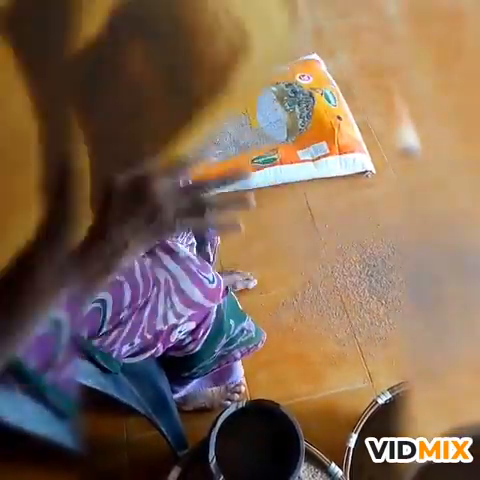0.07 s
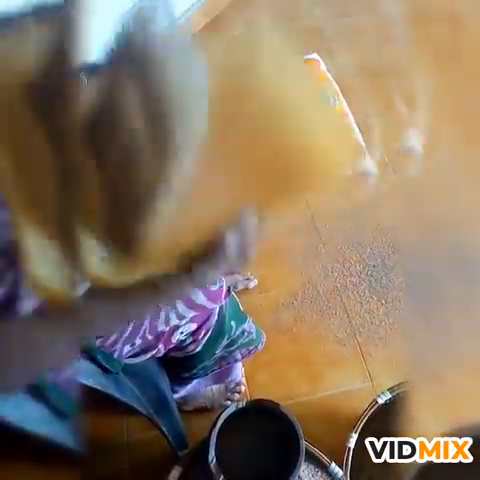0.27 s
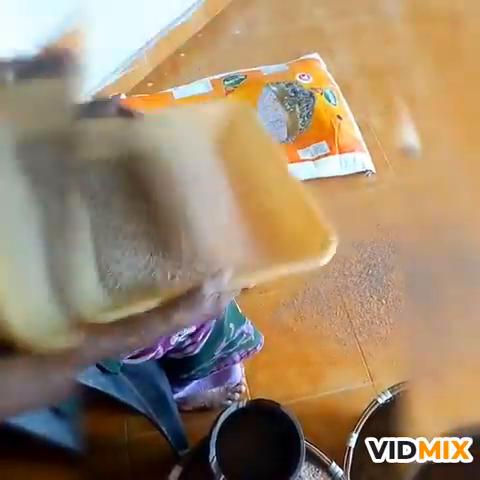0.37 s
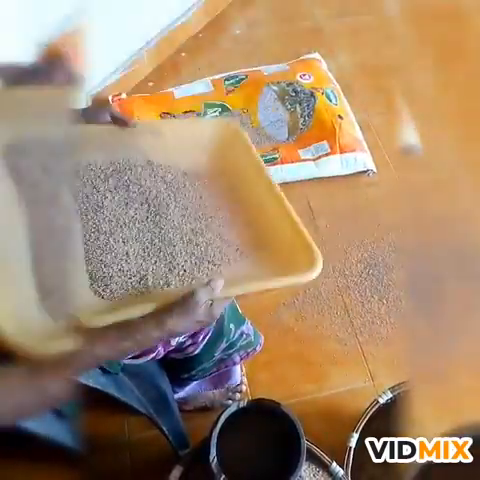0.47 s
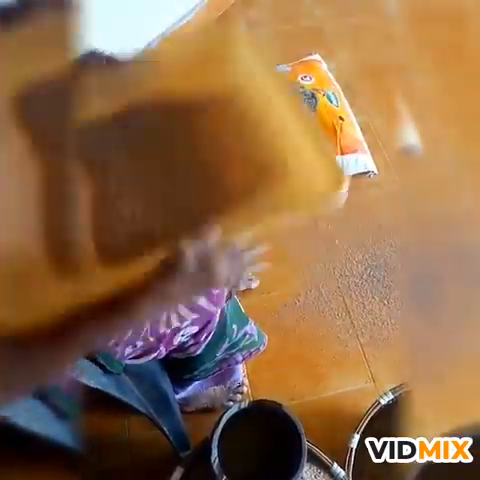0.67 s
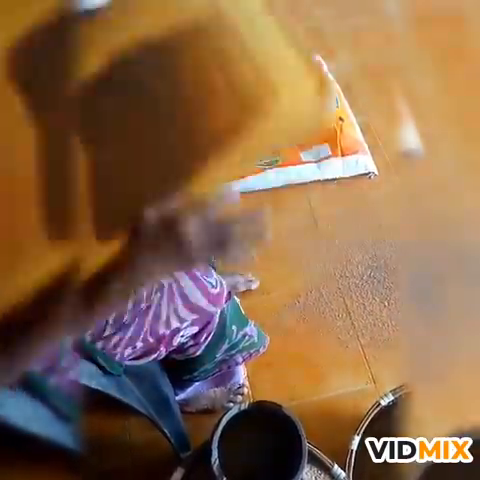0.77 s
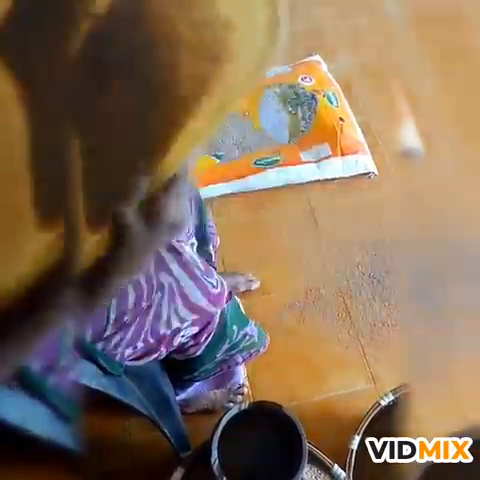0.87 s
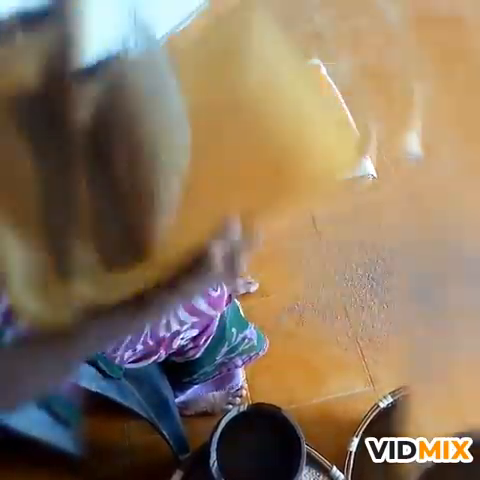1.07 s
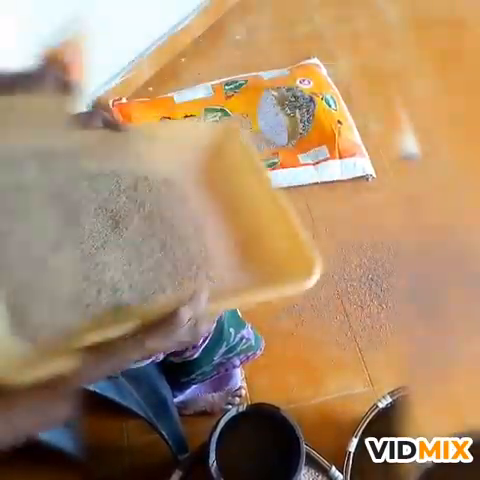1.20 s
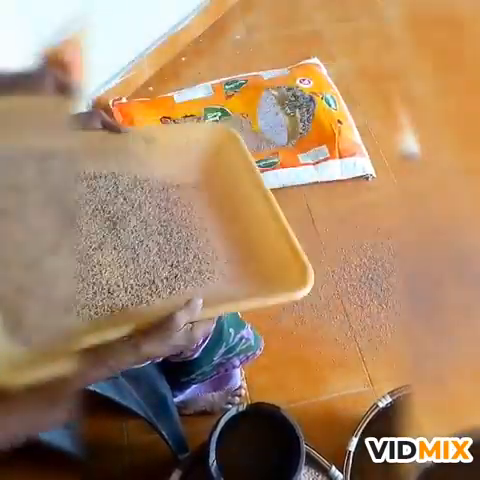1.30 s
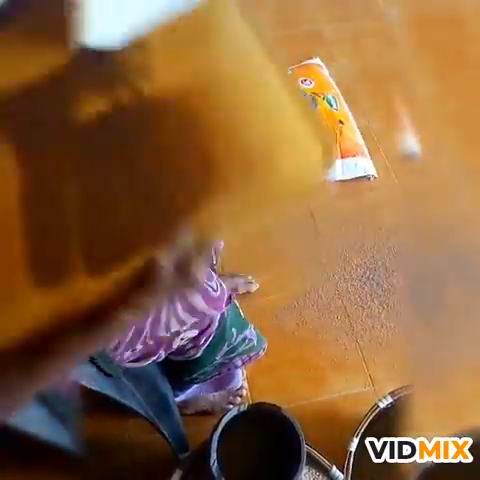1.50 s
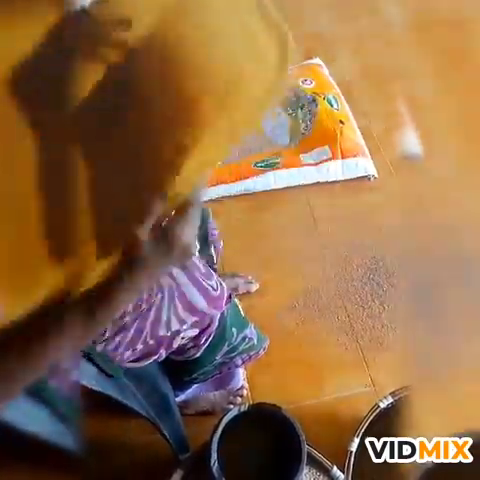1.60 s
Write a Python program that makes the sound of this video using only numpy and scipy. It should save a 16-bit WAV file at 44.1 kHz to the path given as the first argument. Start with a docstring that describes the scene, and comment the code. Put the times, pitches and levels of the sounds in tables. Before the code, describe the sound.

Grain is winnowed in a plastic tray, close by in a bare room with a faint steady rush. At about 0.25 seconds a hand slaps the tray with a sharp knock, and the grain falls back, hissing, pattering and sliding until 0.7 seconds. A second, slightly softer slap comes at 1 second. Another rasping swish peaks near 1.3 seconds and ends with a few seeds rolling around 1.5 seconds.

```python
"""A faint rasp of sliding grain over a steady rush, then a hand slaps a plastic tray, close by in a bare room.
The grain is being winnowed: twice a slap tosses it, exciting the damped modes of the tray and the room.
It rains back as thousands of tiny impacts, which add up to a hiss of seed on seed and a patter on the
tray's floor, and it slides on with a rasp of friction."""
import sys
import numpy as np
from scipy import signal
from scipy.fft import rfft, irfft, next_fast_len
from scipy.io import wavfile

SR = 44100
rng = np.random.default_rng(int(sys.argv[2]) if len(sys.argv) > 2 else 0)


def wrap_up_sound(samples):
    """Save the sound to the file named by the first command line argument, as 16-bit audio."""
    columns = np.atleast_2d(samples).T
    # keep every value between -1 and 1, then stretch to whole-number steps
    tamed = np.clip(columns, -1, 1)
    steps = np.round(tamed * 32767).astype(np.int16)
    wavfile.write(sys.argv[1], SR, steps)


N = 72765
TIME = np.arange(N) / SR
GRAINS_PER_S, SIZE_SPREAD_DB = 9000, 2
GRAIN_ROOM_DB = -7


def amp(db):
    """Amplitude grows tenfold every 20 dB."""
    return 10 ** (np.asarray(db) / 20)


def unit(x):
    """Normalisation to rms 1."""
    return x / np.sqrt(np.mean(x ** 2) + 1e-20)


def along(points, hz):
    """Interpolation of (Hz, value) points on a logarithmic frequency axis."""
    f, v = np.transpose(points)
    return np.interp(np.log(hz + 1), np.log(f + 1), v)


def curve(rows):
    """Linear interpolation of (seconds, value) points at every sample."""
    return np.interp(TIME, *np.transpose(rows))


def filtered(x, response):
    """Linear filtering: the spectrum is multiplied by a frequency response."""
    size = next_fast_len(N + SR // 2)
    return irfft(rfft(x, size) * response(np.fft.rfftfreq(size, 1 / SR)), size)[..., :N]


def coloured(x, points):
    """Minimum-phase filtering through (Hz, dB) points, scaled to a mean power gain of 1."""
    size = 8192
    cepstrum = irfft(np.log(amp(along(points, np.fft.rfftfreq(size, 1 / SR)))))
    cepstrum[1:size // 2] *= 2  # folding the cepstrum makes the filter causal
    cepstrum[size // 2 + 1:] = 0
    impulse = irfft(np.exp(rfft(cepstrum)))
    impulse /= np.linalg.norm(impulse)
    return signal.fftconvolve(np.atleast_2d(x), impulse[None], axes=1)[:, :x.shape[-1]]


def pan(db):
    """Level difference: left exceeds right by db."""
    return amp([[db / 2], [-db / 2]])


# Likeness of left and right. Each row: frequency in Hz, correlation.
COHERENCE = [(60, 0.96), (300, 0.5), (700, 0.54), (1400, .2), (3100, 0), (7000, 0)]
def paired(x):
    """Spatial coherence: long waves reach two microphones alike, short waves unrelated."""
    def mid_side_gains(hz):
        angle = np.arccos(np.clip(along(COHERENCE, hz), -1, 1)) / 2
        return np.array([np.cos(angle), np.sin(angle)])
    mid, side = filtered(x, mid_side_gains)
    return np.array([mid + side, mid - side])


def noise():
    """Gaussian noise in stereo, coherent in the bass."""
    return paired(rng.standard_normal((2, N)))


def band(hz, width_hz):
    """Quadrature modulation: two slow noises on a fixed or moving carrier give a narrow band of rms 1."""
    lowpass = lambda f: 1 / (1 + (f / width_hz) ** 2) ** 1.5
    in_phase = filtered(noise(), lowpass)
    quadrature = filtered(noise(), lowpass)
    phase = 2 * np.pi * np.cumsum(hz * np.ones(N)) / SR
    return unit(in_phase * np.cos(phase) + quadrature * np.sin(phase))


def impacts(per_s, spread_db):
    """Shot noise of mean power 1: each random impact reaches each microphone with its own strength."""
    chance = np.clip(per_s / SR, 1e-4, 1)
    hits = rng.random(N) < chance
    sizes = amp(spread_db * np.clip(rng.standard_normal(N), -2, 2))
    return unit(hits * sizes * rng.standard_normal((2, N)) / np.sqrt(chance))


# The room's decay. Each row: frequency in Hz, reverberation time in seconds.
REVERB_TIMES = [(100, 0.69), (350, 0.46), (1100, 0.41), (5000, 0.4), (9000, 0.38), (15000, 0.23)]
def room(x, wet_db, onset_s=.009):
    """Reverberation: a diffuse tail follows the direct sound and decays exponentially, treble first."""
    hz, t, spectrum = signal.stft(rng.standard_normal((2, SR)), SR, nperseg=256)
    decay = amp(-60 * t / along(REVERB_TIMES, hz)[:, None])
    tail = paired(signal.istft(spectrum * decay, SR, nperseg=256)[1])
    tail *= np.clip(TIME / onset_s - .5, 0, 1)
    tail /= np.linalg.norm(tail[0])
    return x + amp(wet_db) * signal.fftconvolve(x, tail, axes=1)[:, :N]


# The room's rush. Each row: frequency in Hz, relative level in dB.
RUSH_SPECTRUM = [(25, -46), (50, -32), (100, -24), (190, -22), (320, -17.5), (530, -13), (750, -9),
                 (1400, -3.5), (2200, -8.5), (3600, -5.5), (5000, -6.5), (6300, -10.5), (7700, -31),
                 (13000, -38.5), (15500, -36)]
def background(rush_db=-51, hum_db=-63.5, fade_db_per_s=4):
    """Stationary broadband noise is heard as a rush, a narrow band as a wavering hum that slowly fades."""
    rush = amp(rush_db) * unit(coloured(noise(), RUSH_SPECTRUM))
    hum = band(hz=721, width_hz=40) * amp(hum_db - fade_db_per_s * TIME)
    return rush * pan(db=1.2) + hum


# The tray's low resonance. Each row: time in seconds, frequency in Hz, level in dB.
DRONE_PATH = [(.24, 200, -84), (0.292, 252, -71), (0.371, 316.6, -54), (0.458, 396.7, -58),
              (0.521, 528.6, -57), (0.629, 760, -48.5), (0.719, 748, -72), (1.021, 280, -88),
              (1.13, 304.8, -55), (1.22, 376, -69), (1.291, 480.7, -49.5), (1.399, 432.3, -50.5),
              (1.48, 449, -78)]
def tray_drone():
    """Forced vibration: falling grain sustains a resonance that climbs during each fall."""
    s, hz, db = np.transpose(DRONE_PATH)
    resonance = band(curve(np.c_[s, hz]), width_hz=58)
    return resonance * amp(curve(np.c_[s, db])) * pan(db=3.5)


# The last seeds. Each row: peak time in seconds, level in dB, half-length in seconds,
# centre frequency in Hz, width in Hz.
SEED_ROLLS = [(0.69, -54, 0.025, 4940, 550), (1.52, -46.5, 0.056, 4730, 500),
              (1.531, -44.5, 0.052, 5700, 650)]
def rolling_seeds():
    """Rolling contact: seeds run down the tray with a narrow, high rasp that swells and fades."""
    out = np.zeros((2, N))
    for peak_s, db, half_s, hz, width_hz in SEED_ROLLS:
        swell = np.exp(-((TIME - peak_s) / half_s) ** 2 / 2)
        out += amp(db) * swell * band(hz, width_hz)
    return room(out * pan(db=-1), GRAIN_ROOM_DB)


# Strength of the sliding. Each row: time in seconds, level in dB.
SLIDE_LEVELS = [(0, -51), (.08, -62), (.22, -56), (.275, -36), (.325, -39.5), (.41, -29.5), (.47, -26.5),
                (.52, -29.5), (.62, -27.5), (.72, -45), (.80, -59), (1.02, -69.5), (1.10, -44), (1.16, -39),
                (1.21, -33.5), (1.285, -25), (1.34, -30), (1.42, -33), (1.5, -48.5), (1.65, -71)]
# Grain scraping on plastic. Each row: frequency in Hz, relative level in dB.
RASP_SPECTRUM = [(100, -60.5), (600, -36), (1500, -26.5), (3000, 6.5), (4200, 9), (4900, 10.5), (5800, 7.5),
                 (6600, 3.5), (7800, -66), (15000, -30)]
def sliding_grain():
    """Friction noise: countless small contacts with the tilted tray merge into a rasp."""
    scrape = paired(impacts(GRAINS_PER_S, SIZE_SPREAD_DB)) * amp(curve(SLIDE_LEVELS))
    return room(coloured(scrape, RASP_SPECTRUM) * pan(db=-.5), GRAIN_ROOM_DB)


def decay_envelope(age, t60, attack_s=.001):
    """Damping: after a quick rise, a struck body's vibration falls 60 dB in t60 seconds."""
    return 1000 ** (-age / t60) * (1 - np.exp(-age / attack_s))


def mode(age, hz, t60, boom_db, boom_below_hz=620):
    """A normal mode rings as a damped sine, its phase scattered between ears; low modes gain boom_db."""
    cycles = hz * age + rng.normal(0, .08, (2, 1))
    return decay_envelope(age, t60) * amp(boom_db * (hz < boom_below_hz)) * np.sin(2 * np.pi * cycles)


# Hand on tray, a light and a firm contact per slap. Each row: start in seconds, level in dB,
# pitch ratio of the tray's modes, crack gain in dB, low-mode gain in dB, left over right in dB.
HAND_CONTACTS = [(.240, -34.5, 1.26, -25, 7, 7), (0.2475, -9, .985, -6.5, -0.5, 2.5),
                 (1.012, -29.5, 1.5, 0.5, -1, 3.5), (1.0288, -12.5, 1.036, -6, -3.5, 3.5)]
# The tray, damped by hands and grain. Each row: base frequency in Hz, relative level in dB, T60 in seconds.
TRAY_MODES = [(149.8, -28, 0.089), (278, -21.5, 0.08), (356, -13.5, 0.027), (549, -17, 0.035),
              (677, -22.5, 0.029), (947, -5.5, 0.029), (1222, -8, 0.024), (1402, -5, 0.023),
              (1706, -5.5, .014), (2145, -20, 0.011), (2830, -30.5, 0.045)]
# The room's strongest modes. Each row: frequency in Hz, relative level in dB, T60 in seconds.
ROOM_RESONANCES = [(294, -40, 0.39), (529.5, -23.5, 0.24), (945, -17, 0.12), (987, -28, 0.7),
                   (1140, -24.5, 0.59), (1278, -27, 0.73), (1440, -19, 0.15)]
# The crack of contact. Each row: frequency in Hz, relative level in dB.
CRACK_SPECTRUM = [(30, -12), (100, -12), (250, -7.5), (1200, -0.5), (2500, 11.5), (5000, 1), (6500, -7),
                  (8000, -30.5), (15000, -27.5)]
def slaps():
    """Impulse excitation: each contact cracks and sets the modes of tray and room ringing."""
    out = np.zeros((2, N))
    low_cut = signal.butter(2, 270, 'highpass', fs=SR, output='sos')  # the knock carries little bass below about 270 Hz
    for start_s, db, ratio, crack_db, boom_db, pan_db in HAND_CONTACTS:
        age = np.maximum(TIME - start_s, 0)
        knock = sum((-1) ** k * amp(level) * mode(age, hz * ratio, t60, boom_db)
                    for k, (hz, level, t60) in enumerate(TRAY_MODES))
        ring = sum(amp(level) * mode(age, hz, t60, boom_db) for hz, level, t60 in ROOM_RESONANCES)
        crack = amp(crack_db) * coloured(noise() * decay_envelope(age, t60=.016), CRACK_SPECTRUM)
        direct = signal.sosfilt(low_cut, knock) + crack
        out += amp(db) * pan(pan_db) * (room(direct, wet_db=-.5) + ring)
    return out


# Flow of falling grain, one list per toss. Each row: time in seconds, flow level in dB.
GRAIN_FLOWS = [
    [(.30, -78), (.325, -61), (.365, -39.5), (.47, -30), (.56, -36), (.63, -43), (.69, -62.5), (.74, -80),
     (.84, -96)],
    [(1.09, -68.5), (1.155, -58), (1.2, -38), (1.28, -31), (1.33, -32.5), (1.39, -43), (1.44, -55.5),
     (1.49, -99), (1.6, -92)],
]
# How hard the grain drums. Each entry: patter gain of one toss in dB.
PATTER_GAINS = [-0.5, 0]
# Seed on seed, to the left and to the right. Each row: frequency in Hz, relative level in dB.
LEFT_HISS_SPECTRUM = [(200, -86), (1000, -16.5), (2200, -12), (3800, -8), (4350, -0.5), (5100, 1.5),
                      (6000, -11), (6700, -18.5), (7500, -15.5), (8300, -41), (9700, -28.5), (12000, -19.5),
                      (13500, -30.5), (15300, -6.5)]
RIGHT_HISS_SPECTRUM = [(200, -75), (1000, -17), (2200, -19.5), (3400, -10.5), (4500, -18), (6000, -4),
                       (6700, -8), (7800, -26.5), (10000, -26), (13500, -46), (15200, -18)]
# Seed on tray. Each row: frequency in Hz, relative level in dB.
PATTER_SPECTRUM = [(25, -20), (50, -23), (100, -32), (170, -24.5), (290, -23), (450, -6.5), (700, -3),
                   (1150, 3), (1700, 4.5), (2500, 3), (4000, -12.5), (8000, -35.5)]
def falling_grain(hiss_gain_db=12):
    """Incoherent addition: more flow brings more and louder impacts, a bright hiss and a duller patter."""
    rate_slope, hiss_slope, patter_slope = .2, .8, .57  # dB per dB of flow
    out = np.zeros((2, N))
    for fall, patter_db in zip(GRAIN_FLOWS, PATTER_GAINS):
        flow_db = curve(fall)
        peak_db = flow_db.max()
        outside_s = np.maximum(fall[0][0] - TIME, 0) + np.maximum(TIME - fall[-1][0], 0)
        relative_db = flow_db - peak_db - 200 * outside_s  # the flow dies away on both sides of the fall
        rate = GRAINS_PER_S * amp(relative_db * rate_slope)
        left, right = impacts(rate, SIZE_SPREAD_DB) * amp(peak_db + hiss_gain_db + hiss_slope * relative_db)
        hiss = np.vstack([coloured(left, LEFT_HISS_SPECTRUM), coloured(right, RIGHT_HISS_SPECTRUM)])
        drumming = paired(impacts(rate, spread_db=3)) * amp(peak_db + patter_db + patter_slope * relative_db)
        out += hiss * pan(db=7.5) + coloured(drumming, PATTER_SPECTRUM)
    return room(out, GRAIN_ROOM_DB)


def scene():
    """Superposition: the pressures of slaps, grain and background add."""
    return slaps() + falling_grain() + tray_drone() + sliding_grain() + rolling_seeds() + background()


def record(dry, top_hz=15600, edge_hz=300):
    """Band limiting: a steep low-pass removes the highest treble."""
    return filtered(dry, lambda hz: np.clip((top_hz - hz) / edge_hz + .5, 0, 1) ** 2)


dry = scene()
out = record(dry)
wrap_up_sound(out)
```